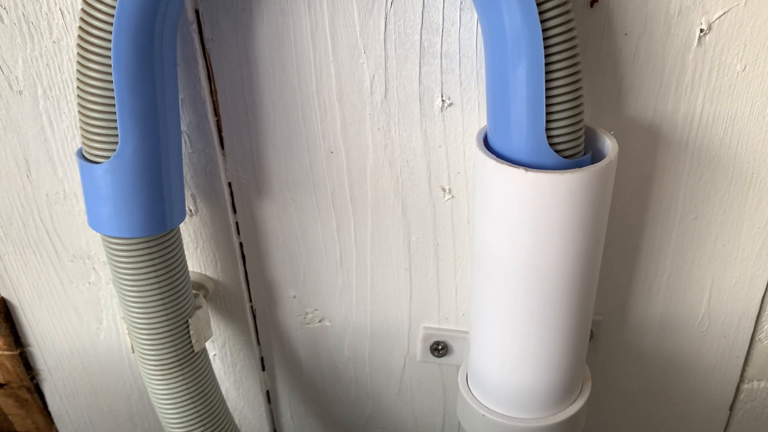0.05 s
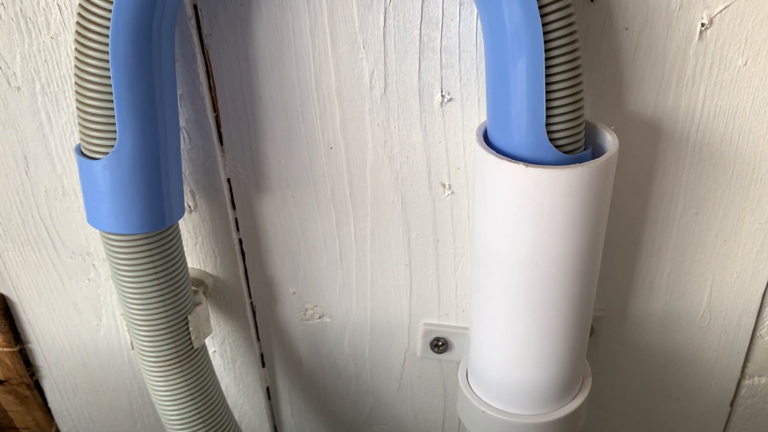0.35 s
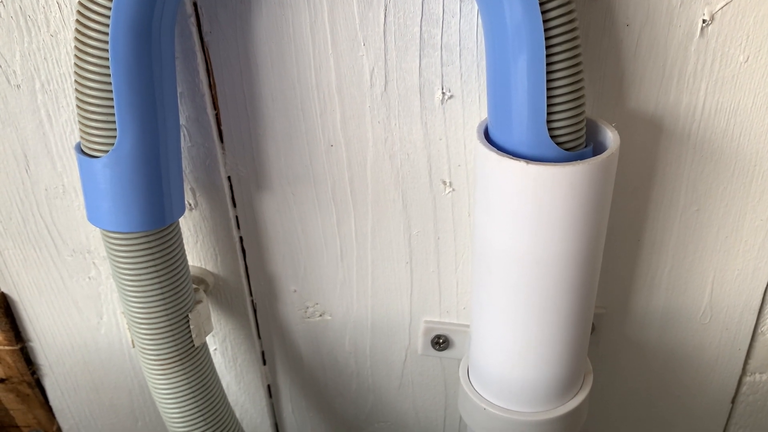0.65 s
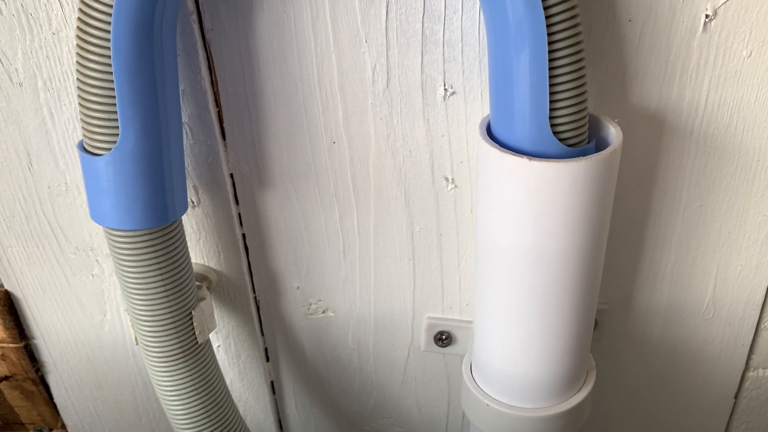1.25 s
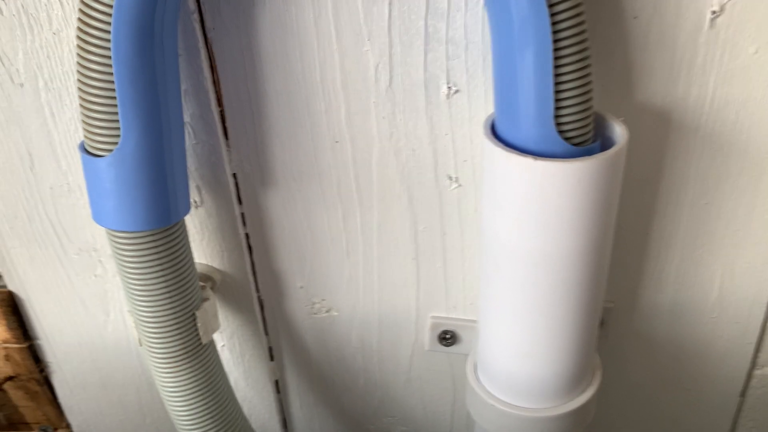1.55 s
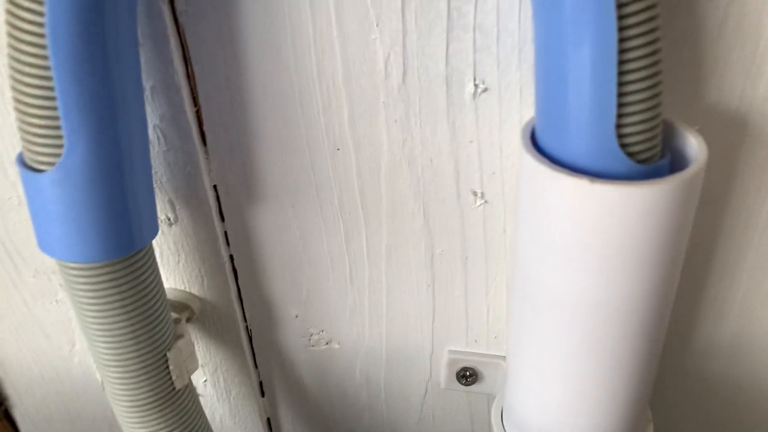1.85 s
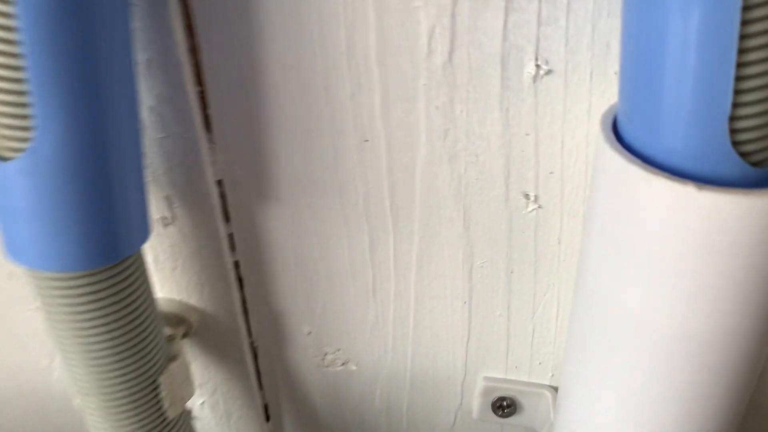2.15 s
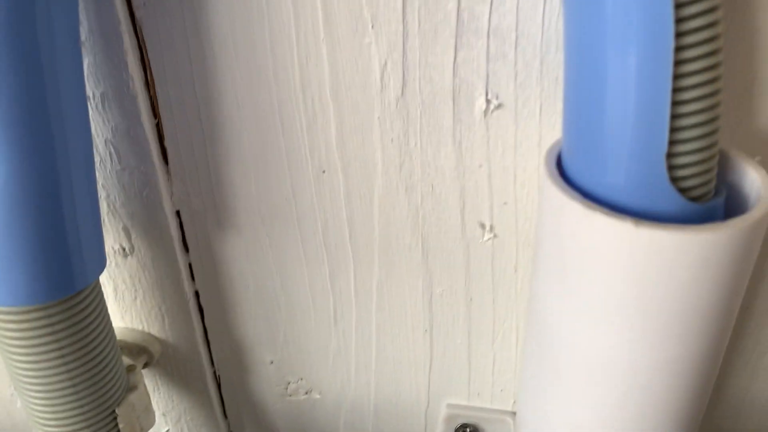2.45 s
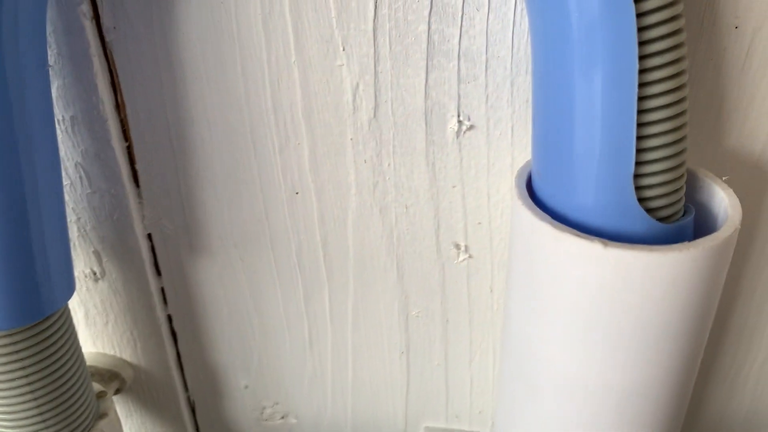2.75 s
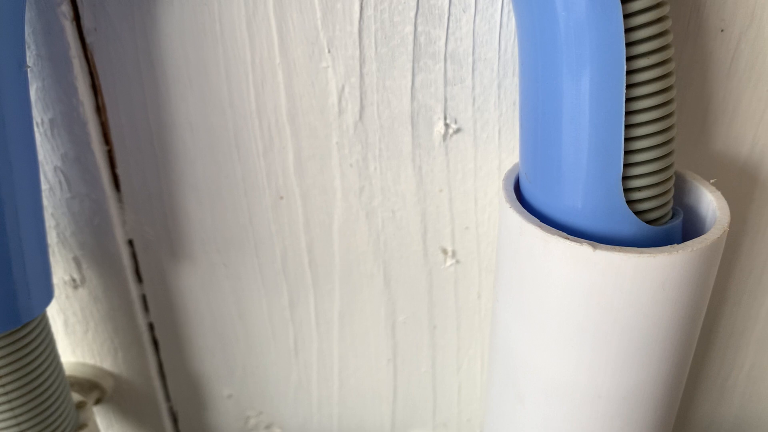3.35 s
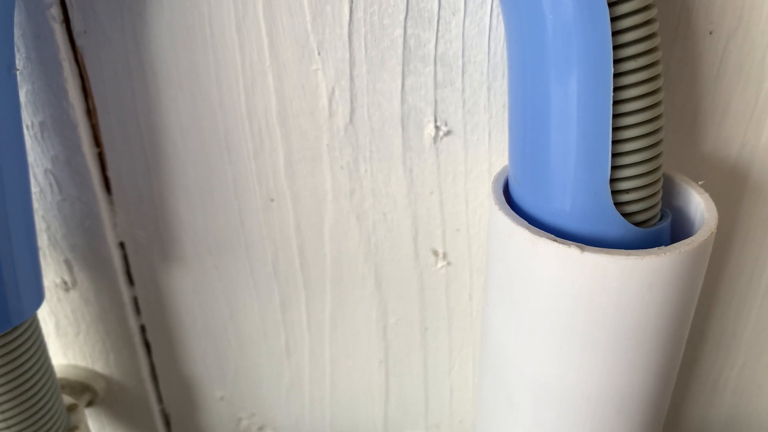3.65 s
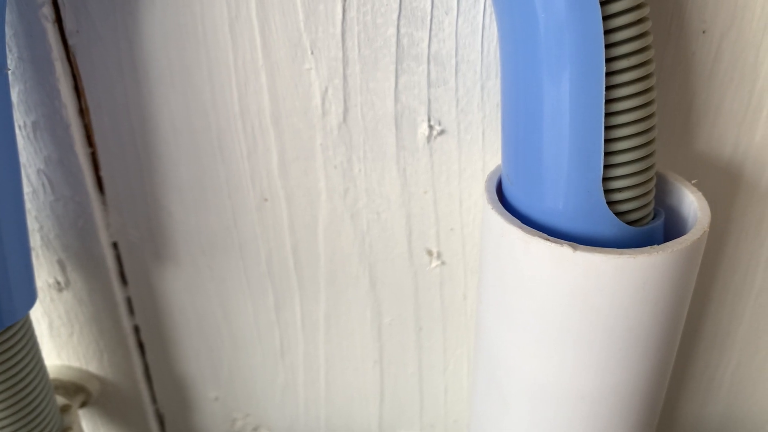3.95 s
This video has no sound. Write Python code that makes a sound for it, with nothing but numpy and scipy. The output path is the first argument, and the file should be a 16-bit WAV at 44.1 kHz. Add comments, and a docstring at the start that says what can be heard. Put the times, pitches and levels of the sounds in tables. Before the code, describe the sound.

Water gurgles in a drain pipe after a washing machine's low hum and rumble.

```python
"""A washing machine's hum is heard first, over a low rumble and a soft wash, close by in a small room.
The hum fades as a lower drone grows; a thin hiss swells twice, with two faint ticks; the wash sinks away.
Near the end, air gulps through the water where the drain hose hangs in a plastic standpipe.
Large air pockets throb as damped oscillators; small bubbles pop and spray, driving the air column
of hose and pipe at its resonances, and the room reverberates."""
import sys
import numpy as np
from scipy import signal
from scipy.fft import rfft, irfft
from scipy.io import wavfile
from scipy.ndimage import uniform_filter1d

SR = 44100
rng = np.random.default_rng(int(sys.argv[2]) if len(sys.argv) > 2 else 0)


def master(y):
    """Save y as 16-bit WAV."""
    cut = np.clip(np.atleast_2d(y).T, -1, 1)
    pcm = np.round(cut * 32767)  # scale
    wavfile.write(sys.argv[1], SR, pcm.astype(np.int16))


N = 176400
TIME = np.arange(N) / SR
AGE = np.arange(SR // 4) / SR  # seconds since an event began

# Mains hum. Each row: harmonic number, relative level in dB.
HUM_HARMONICS = [(1, -0.5), (2, -17.5), (3, -17.5)]
# Envelopes of the sustained sounds. Each row: time in seconds, level in dB.
HUM_LEVEL = [(0, -36.5), (.22, -34), (.36, -36), (.8, -41), (1.0, -37), (1.25, -38), (1.5, -38),
             (1.78, -42.5), (1.95, -47), (4, -75.5)]
DRONE_LEVEL = [(0, -68), (1.2, -66), (1.5, -48.5), (2.1, -45.5), (2.35, -34.5), (2.55, -51.5),
               (3.1, -37.5), (4, -42)]
WASH_LEVEL = [(0, -41), (.9, -40.5), (1.4, -40.5), (1.85, -42), (2.15, -44), (2.28, -59), (4, -76)]
HISS_LEVEL = [(1.56, -76.5), (1.68, -54.5), (1.80, -54), (1.885, -70), (1.975, -53), (2.11, -52),
              (2.205, -57), (2.28, -100)]
# Noise spectra. Each row: frequency in Hz, relative spectral density in dB.
RUMBLE_SPECTRUM = [(20, -28), (53, -13), (74, -7), (168, -19), (270, -25), (400, -34), (900, -43),
                   (3400, -66), (16000, -77)]
WASH_SPECTRUM = [(25, -24), (50, 6.5), (90, 3.5), (150, -12.5), (260, 1), (400, -13.5), (800, -16.5),
                 (1700, -23), (2500, -30.5), (4500, -35.5), (6700, -42), (8000, -54.5), (12000, -51),
                 (14000, -79)]
HISS_SPECTRUM = [(1500, -14), (3500, -9.5), (6000, -7.5), (8500, -13), (11500, -5), (15000, -15.5)]
# Coherence of the noises. Each row: frequency in Hz, correlation of left with right.
RUMBLE_WASH_COHERENCE = [(60, 0.94), (180, 0.35), (700, 0.017)]
HISS_COHERENCE = [(6000, 0.044)]
# Balance of the noises. Each row: frequency in Hz, left minus right in dB.
NOISE_BALANCE = [(180, -5), (550, -0.86)]
# Faint ticks and spits of spray. Each row: start in seconds, level in dB, centre in Hz, decay in seconds.
TICKS = [(1.5935, -47, 3000, 0.00096), (1.978, -47.5, 4000, 0.0084)]
SPITS = [(3.251, -30, 9700, 0.0021), (3.2506, -39, 5400, 0.0078), (3.307, -51, 10000, 0.0031),
         (3.318, -55, 8560, 0.005), (3.384, -46.5, 6550, 0.021), (3.384, -50.5, 12500, 0.02),
         (3.434, -36.5, 10000, 0.0024), (3.435, -37, 5740, 0.0091), (3.471, -43.5, 6230, 0.012),
         (3.494, -37.5, 6050, 0.0046), (3.508, -43.5, 9800, 0.018), (3.511, -38, 6300, 0.023),
         (3.532, -42.5, 3170, 0.023), (3.533, -53, 11100, 0.033), (3.563, -55, 6570, 0.031),
         (3.587, -33.5, 4600, 0.0063), (3.599, -45, 5700, 0.012), (3.711, -50, 8000, 0.0099),
         (3.723, -53, 5940, 0.0061), (3.779, -63, 11000, 0.0046), (3.82, -54, 10500, 0.0043),
         (3.831, -57, 6860, 0.01), (3.846, -54.5, 5460, .004)]
# Bursting bubbles. Each row: start in seconds, level in dB, pitch in Hz, froth decay in seconds.
POPS = [(3.2516, -27.5, 594, 0.014), (3.364, -41, 593, 0.012), (3.399, -38.5, 630, 0.018),
        (3.427, -26, 1090, 0.01), (3.476, -25.5, 1050, 0.0022), (3.480, -27, 500, 0.02),
        (3.495, -40, 890, 0.014), (3.511, -35.5, 1810, 0.016), (3.521, -35, 563, 0.003),
        (3.535, -23.5, 607, 0.0058), (3.537, -40.5, 1980, 0.035), (3.5635, -26.5, 750, 0.0028),
        (3.577, -28.5, 670, 0.0084), (3.591, -28.5, 520, 0.0058), (3.609, -28, 680, 0.0063),
        (3.631, -24.5, 486, 0.0036), (3.645, -34.5, 415, 0.0012), (3.711, -24.5, 487, 0.012),
        (3.724, -37, 570, 0.019), (3.820, -32.5, 920, 0.0068), (3.830, -37, 1900, 0.0035),
        (3.847, -34.5, 680, 0.01)]
# Air resonances of hose and standpipe.
# Each row: frequency in Hz, relative peak in dB, bandwidth in Hz, left minus right in dB.
PIPE_MODES = [(370.3, -2.5, 10.5, -4), (402, -4, 12, -4), (470, 3, 32, -7), (547.7, -4.5, 25, -7),
              (583, -6, 51, 11), (633, -2, 15.7, 13.5), (748.5, -5.5, 24.4, -7.5), (792, -18, 6.2, -6),
              (3280, -17, 140, -1.5), (1089.3, -3.5, 22.2, 15.5), (1138, -2, 34, -2.5), (1330, -24, 20, 21),
              (1615, -0.5, 52, -1), (1680, -28, 22, -8), (1834, -4.5, 26, 0), (2224, -12, 16, -19),
              (2403, -18.5, 27, 21), (2740, -20, 123, -24.5), (2850, -10, 39, 9), (2930, -8.5, 23, 2.5),
              (4000, -13.5, 190, -3.5), (4600, -6, 69, -5), (5140, -17, 230, -13.5), (5780, -10.5, 61, -2),
              (6230, -15, 190, -6.5), (6920, -16.5, 800, -2), (8000, -15, 140, -5), (12250, -12, 200, -4),
              (9780, -13.5, 270, 5), (10340, -20.5, 180, 18), (10850, -17, 310, -17), (11500, -15, 310, 10)]
# Phase of the pipe's sound. Each row: frequency in Hz, lead of left over right in radians.
PIPE_PHASE = [(60, -5), (400, 0.5), (950, -0.5), (2000, 1.12), (10000, 2.5)]
# Air pockets in the trap. Each row: start in seconds, gain in dB, pitch in Hz, decay in seconds.
GULPS = [(3.257, -0.5, 98, 0.0061), (3.282, -14, 167.4, 0.018), (3.313, -27, 125, 0.021),
         (3.364, -18.5, 114.5, 0.031), (3.447, -11, 136, 0.0097), (3.48, -15, 165, 0.01),
         (3.483, -10, 103.4, 0.019), (3.521, -12, 73.1, 0.029), (3.542, -16.5, 92, 0.022),
         (3.723, -7.5, 132, 0.013), (3.754, -14.5, 142.4, 0.016), (3.808, -25.5, 125.8, 0.067)]
# The room's reverberation. Each row: frequency in Hz, time to fall 60 dB in seconds.
ROOM_T60 = [(100, 0.47), (500, 0.28), (1200, 0.27), (3000, 0.21), (8000, 0.3), (15000, 0.29)]

HUM_HZ, DRONE_HZ, HUM_BALANCE_DB, WAVER_DB, WAVER_SHARE = 98.9, 72.4, -6.5, 2, 0.0062
RUMBLE_DB, ROOM_RIPPLE_DB, BURBLE_DB = -39.5, 4.5, 2.5
CLICKS_PER_S, CLICK_SPREAD_DB, SHOWER_RISE_SHARE = 4600, 14.5, 0.19
SPIT_WIDTH, FROTH_WIDTH = 0.2, 0.82  # bandwidth over centre frequency
POP_DECAY_CYCLES, POP_RISE_PER_S = 1.44, 16
FROTH_EQUAL_S = 0.0093  # froth with this decay has the same energy as its blip
RING_BUILD_S = 0.0002  # the standing waves take a moment to build
DIRECT_DB = -25  # spray straight from the pipe's mouth, on the scale of the mode peaks
GULP_ATTACK_S, GULP_RISE_PER_S, GULP_WOBBLE_RAD = 0.0059, 0.83, 0.76
GULP_LOW_HZ, GULP_HIGH_HZ, GULP_BALANCE_DB = 53.3, 221, 0.4
POP_WET_DB, SPIT_WET_DB, GULP_WET_DB = -9, -17, -19.5
CUTOFF_HZ = 15900


def amp(db):
    return 10 ** (np.asarray(db) / 20)


def unit_rms(x):
    return x / np.sqrt(np.mean(x ** 2) + 1e-20)


def at_frequency(points, hz):
    """Interpolation of a table on a logarithmic frequency axis."""
    f, value = np.transpose(points)
    return np.interp(np.log(hz + 1), np.log(np.abs(f) + 1), value)


def envelope(points):
    return amp(np.interp(TIME, *np.transpose(points)))


def pan(db):
    return amp(np.array([[.5], [-.5]]) * db)


def add(mix, start, sound):
    part = mix[:, round(start * SR):][:, :sound.shape[-1]]
    part += sound[..., :part.shape[1]]


def drift(rate_hz):
    """Low-passed noise gives a slow random fluctuation of unit RMS."""
    f = np.fft.rfftfreq(N, 1 / SR)
    return unit_rms(irfft(rfft(rng.standard_normal(N)) * np.exp(-(f / rate_hz) ** 2), N))


def hum(hz, harmonics, levels):
    """Periodic vibration of the machine gives harmonic lines, wavering in pitch and level."""
    cycles = np.cumsum(hz * (1 + WAVER_SHARE * drift(rate_hz=6.5))) / SR
    lines = sum(amp(db + WAVER_DB * drift(rate_hz=6.0)) * np.sin(2 * np.pi * k * cycles)
                for k, db in harmonics)
    return np.sqrt(2) * lines * envelope(levels) * pan(HUM_BALANCE_DB)


def steady_noise(spectrum, coherence):
    """Partly coherent stereo noise, its spectrum rippled by the room's standing waves."""
    f = np.fft.rfftfreq(N, 1 / SR)
    left, independent = rfft(rng.standard_normal((2, N)))
    correlation = np.clip(at_frequency(coherence, f), -1, 1)
    right = correlation * left + np.sqrt(1 - correlation ** 2) * independent
    ripple = unit_rms(uniform_filter1d(rng.standard_normal(len(f)), size=140))
    ripple_db = ROOM_RIPPLE_DB * ripple * f / (f + 250) / (1 + f / 2500)
    gain = amp(at_frequency(spectrum, f) + ripple_db) * pan(at_frequency(NOISE_BALANCE, f))
    return unit_rms(irfft(np.array([left, right]) * gain, N))


def rumble():
    """Stationary noise with its energy at low frequencies is heard as a rumble."""
    return amp(RUMBLE_DB) * steady_noise(RUMBLE_SPECTRUM, RUMBLE_WASH_COHERENCE)


def wash():
    """Random amplitude modulation of small patches of frequency and time makes noise burble."""
    spectra = signal.stft(steady_noise(WASH_SPECTRUM, RUMBLE_WASH_COHERENCE), nperseg=512)[2]
    patches = uniform_filter1d(rng.standard_normal(spectra.shape[1:]), size=5, axis=0)
    patches = unit_rms(uniform_filter1d(patches, size=6, axis=1))
    burble = signal.istft(spectra * amp(BURBLE_DB * patches), nperseg=512)[1][:, :N]
    return envelope(WASH_LEVEL) * unit_rms(burble)


def hiss():
    """Nearly incoherent treble noise is heard as a wide, thin hiss; it swells twice."""
    begun = TIME > HISS_LEVEL[0][0]
    return envelope(HISS_LEVEL) * steady_noise(HISS_SPECTRUM, HISS_COHERENCE) * begun


def click_shower(hz, width, decay):
    """Shot noise: random clicks swell and die in a band around one frequency, with unit energy."""
    occurs = rng.random(len(AGE)) < CLICKS_PER_S / SR
    size = amp(CLICK_SPREAD_DB * np.minimum(rng.exponential(1, len(AGE)), 2))
    sign = rng.choice([-1, 1], len(AGE))
    swell = (1 - np.exp(-AGE / (SHOWER_RISE_SHARE * decay))) * np.exp(-AGE / decay)
    resonator = signal.iirpeak(hz, hz / min(width * hz, SR / 4), SR)
    shower = signal.lfilter(*resonator, occurs * sign * size * swell)
    return shower / (np.linalg.norm(shower) + 1e-12)


def ticks():
    """Clicks within a few milliseconds fuse into a single faint tick."""
    out = np.zeros((2, N))
    for start, db, hz, decay in TICKS:
        tick = np.array([click_shower(hz, width, decay) for width in (0.85, 0.72)])
        add(out, start, amp(db) * tick * np.sqrt(decay * SR))
    return out


def pipe_response():
    """An air column's impulse response is a sum of damped modes; the wider ones die sooner."""
    ring = np.zeros((2, len(AGE)))
    for hz, db, width, balance in PIPE_MODES:
        strength = amp(db) * pan(balance) * width * (1 + np.pi * width * RING_BUILD_S)
        phase = np.array([[.5], [-.5]]) * at_frequency(PIPE_PHASE, hz)
        ring += strength * np.exp(-np.pi * width * AGE) * np.cos(2 * np.pi * hz * AGE + phase)
    return ring * (1 - np.exp(-AGE / RING_BUILD_S))


def excite(ring, push):
    """Convolution gives the pipe's forced response, scaled to unit RMS over its loudest 12 ms."""
    sound = signal.fftconvolve(push[None], ring, axes=1)
    power = uniform_filter1d((sound ** 2).mean(0), size=530)
    return sound / np.sqrt(power.max())


def spit(ring, hz, decay):
    """Droplet impacts are heard by two paths: directly and through the pipe's resonances."""
    direct = amp(DIRECT_DB) * SR / (2 * np.pi) * (AGE == 0)
    return excite(ring + direct, click_shower(hz, SPIT_WIDTH, decay))


def pop(ring, hz, decay):
    """A bubble's resonance climbs as it nears the surface; its blip and froth ring the pipe."""
    phase = 2 * np.pi * hz * AGE * (1 + POP_RISE_PER_S * AGE / 2)
    blip = np.sin(phase) * np.exp(-AGE * hz / POP_DECAY_CYCLES)
    froth = np.sqrt(decay / FROTH_EQUAL_S) * click_shower(hz, FROTH_WIDTH, decay)
    return excite(ring, blip / np.linalg.norm(blip) + froth)


def gulp(hz, decay):
    """A large air pocket is a damped oscillator, swinging unevenly as its pitch slowly climbs."""
    wobble = GULP_WOBBLE_RAD * drift(rate_hz=85)[:len(AGE)]
    swing = np.sin(2 * np.pi * hz * AGE * (1 + GULP_RISE_PER_S * AGE / 2) + wobble)
    return swing * (1 - np.exp(-(AGE / GULP_ATTACK_S) ** 2)) * np.exp(-AGE / decay)


def reverberation(x):
    """Diffuse reflections in the small room decay exponentially, each band at its own rate."""
    hz, t, spectra = signal.stft(rng.standard_normal((2, SR // 2)), SR, nperseg=256)
    decay = amp(-60 * t / at_frequency(ROOM_T60, hz)[:, None])
    onset = np.minimum(t / 0.0094, 1)
    tail = signal.istft(spectra * decay * onset, SR, nperseg=256)[1]
    return signal.fftconvolve(x, tail / np.linalg.norm(tail[0]), axes=1)[:, :N]


def gurgle():
    """Spray, pops and gulps in the standpipe reach the listener as direct and reverberant sound."""
    ring = pipe_response()
    pops, spits, gulps = np.zeros((3, 2, N))
    for start, db, hz, decay in POPS:
        add(pops, start, amp(db) * pop(ring, hz, decay))
    for start, db, hz, decay in SPITS:
        add(spits, start, amp(db) * spit(ring, hz, decay))
    for start, db, hz, decay in GULPS:
        add(gulps, start, amp(db) * pan(GULP_BALANCE_DB) * gulp(hz, decay))
    gulp_band = signal.butter(2, [GULP_LOW_HZ, GULP_HIGH_HZ], "bandpass", fs=SR, output="sos")
    gulps = signal.sosfilt(gulp_band, gulps)
    into_room = amp(POP_WET_DB) * pops + amp(SPIT_WET_DB) * spits + amp(GULP_WET_DB) * gulps
    return pops + spits + gulps + reverberation(into_room)


def scene():
    """Superposition: the pressures of all the sources add."""
    drain_and_noise = gurgle() + rumble() + wash() + hiss() + ticks()
    mains_hum = hum(HUM_HZ, HUM_HARMONICS, HUM_LEVEL)
    drone = hum(DRONE_HZ, [(1, 0)], DRONE_LEVEL)
    return drain_and_noise + mains_hum + drone


def record(dry):
    """A linear-phase low-pass filter removes the highest treble."""
    lowpass = signal.firwin(511, CUTOFF_HZ, window=("kaiser", 9), fs=SR)
    return signal.oaconvolve(dry, lowpass[None], "same")


dry = scene()
out = record(dry)
master(out)
```